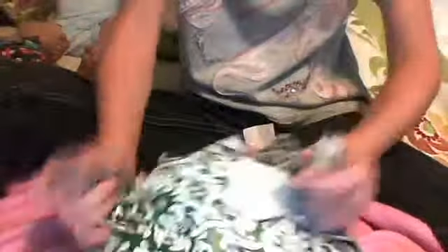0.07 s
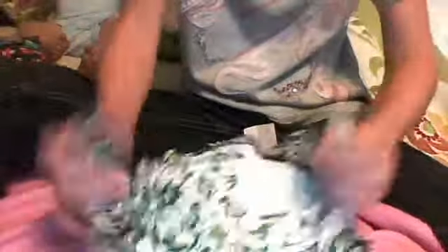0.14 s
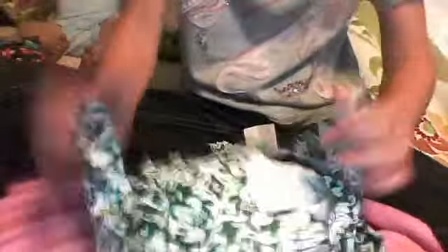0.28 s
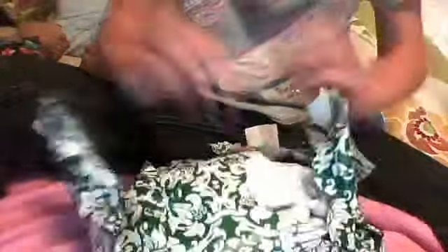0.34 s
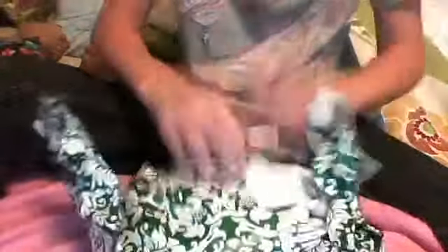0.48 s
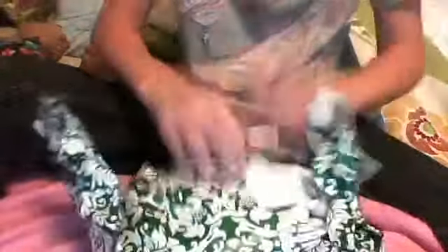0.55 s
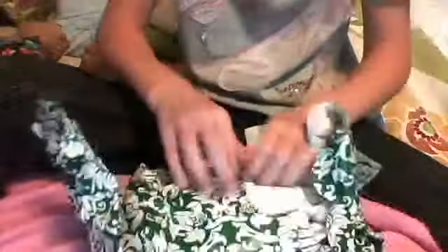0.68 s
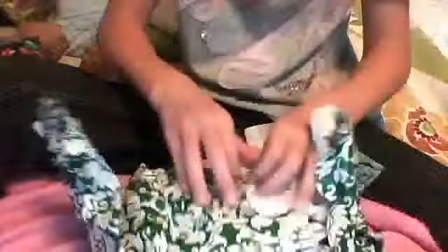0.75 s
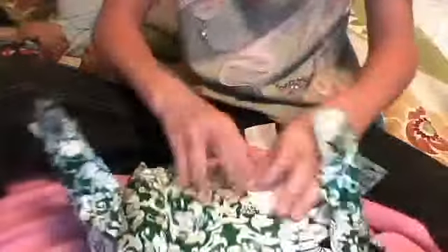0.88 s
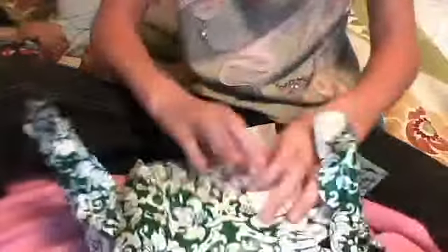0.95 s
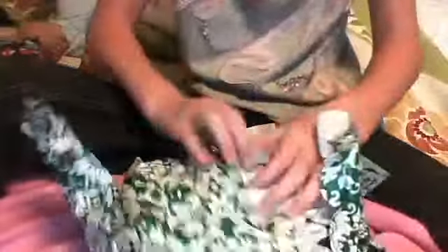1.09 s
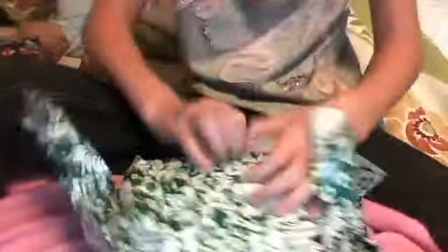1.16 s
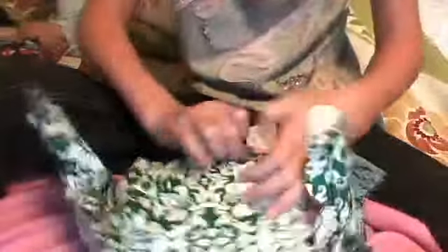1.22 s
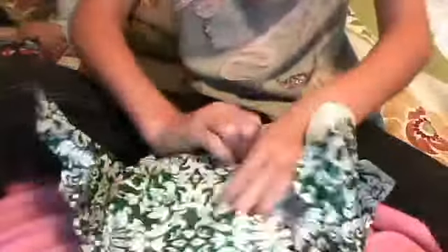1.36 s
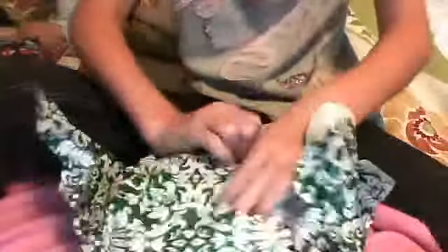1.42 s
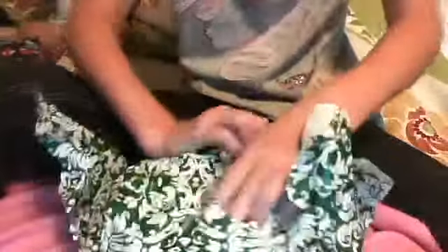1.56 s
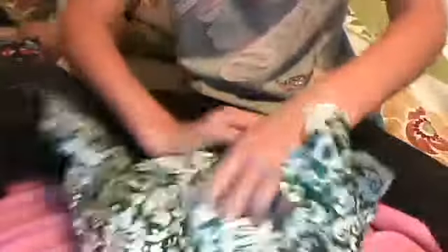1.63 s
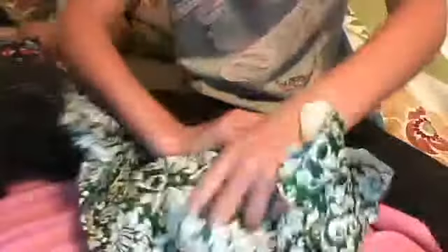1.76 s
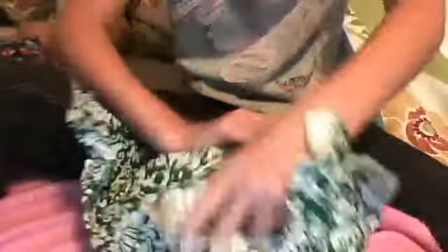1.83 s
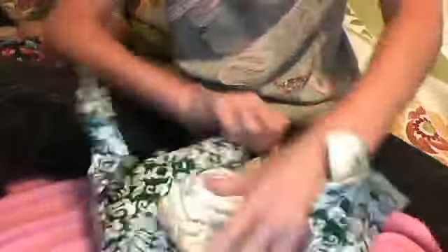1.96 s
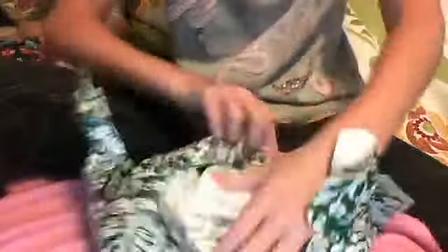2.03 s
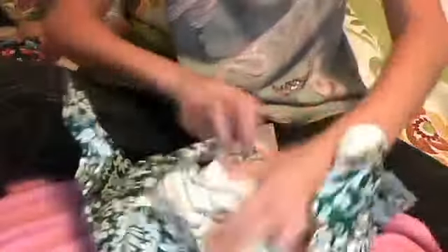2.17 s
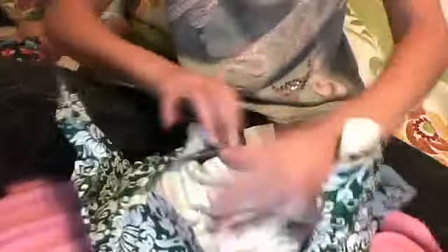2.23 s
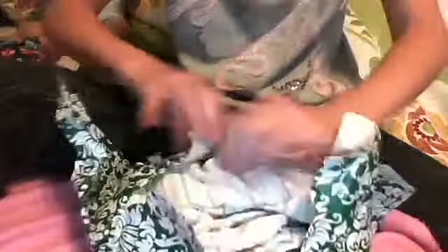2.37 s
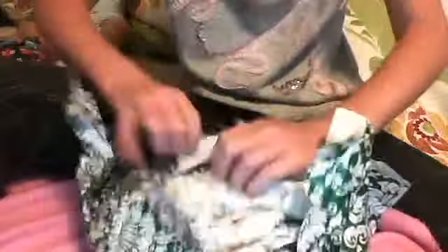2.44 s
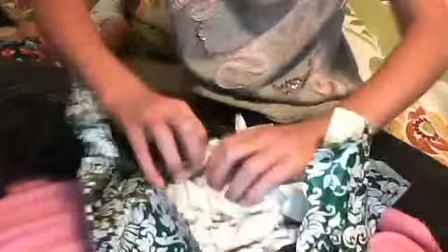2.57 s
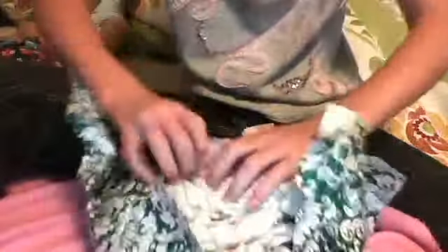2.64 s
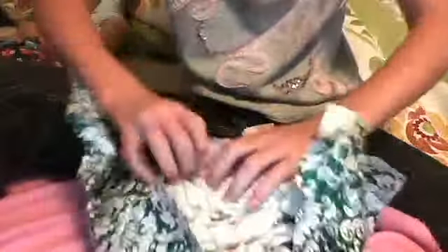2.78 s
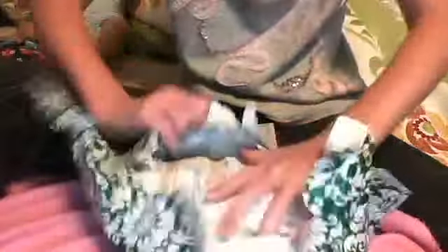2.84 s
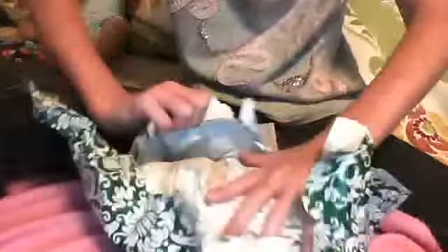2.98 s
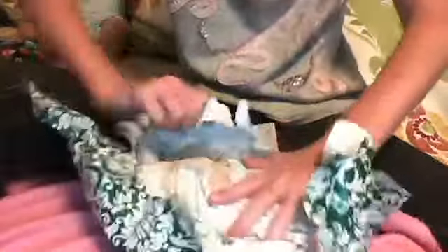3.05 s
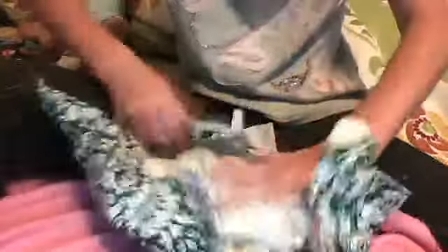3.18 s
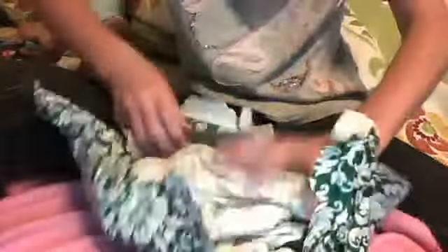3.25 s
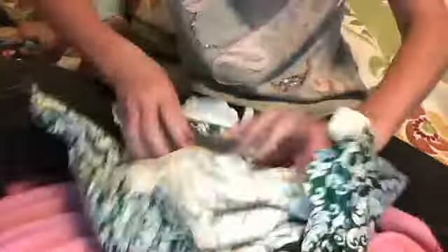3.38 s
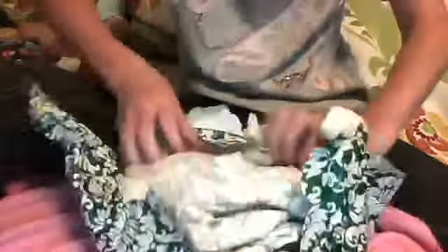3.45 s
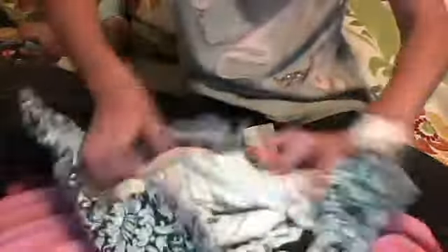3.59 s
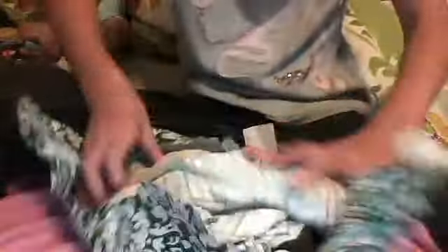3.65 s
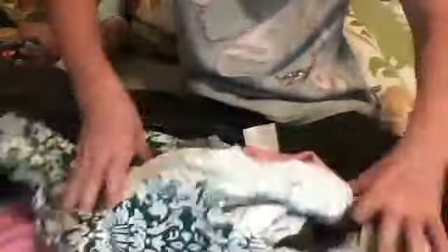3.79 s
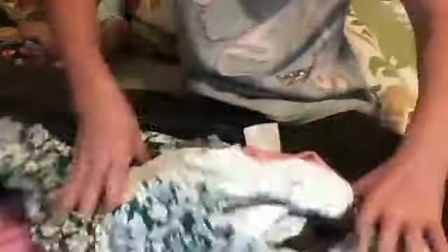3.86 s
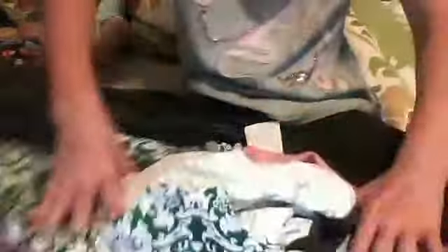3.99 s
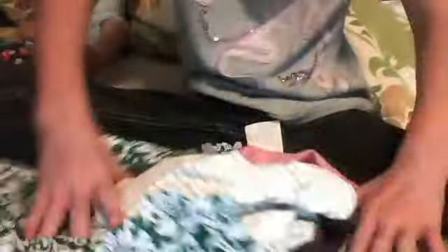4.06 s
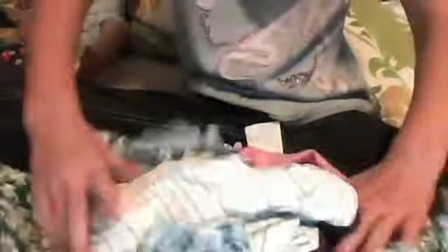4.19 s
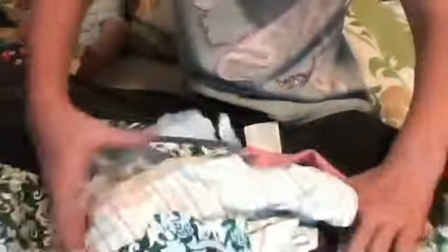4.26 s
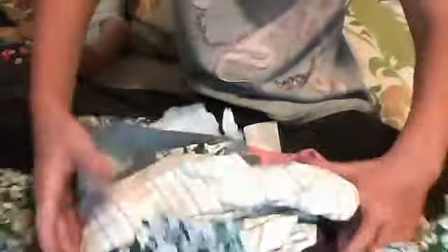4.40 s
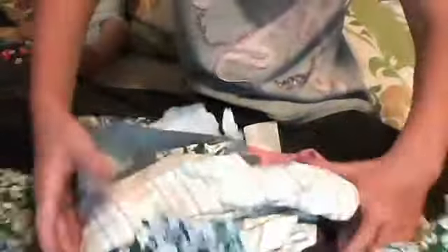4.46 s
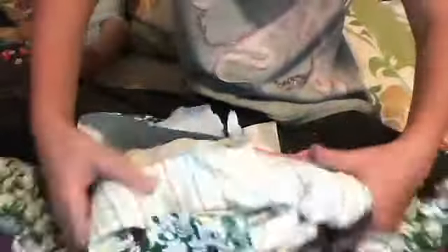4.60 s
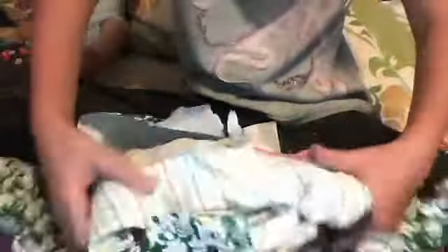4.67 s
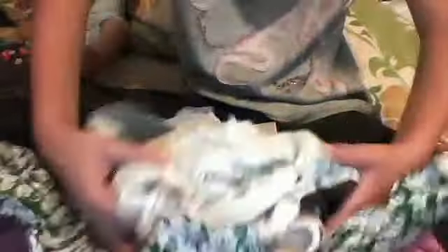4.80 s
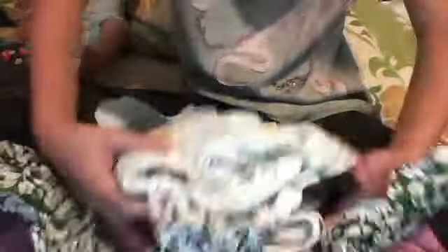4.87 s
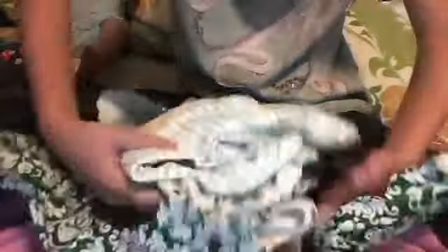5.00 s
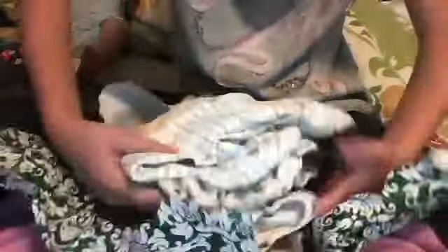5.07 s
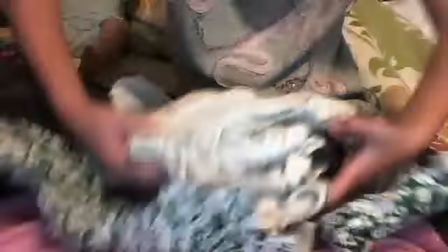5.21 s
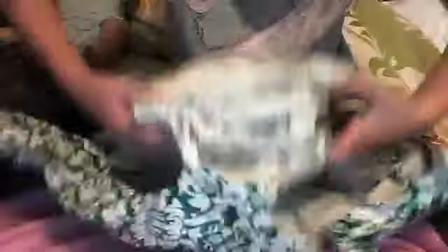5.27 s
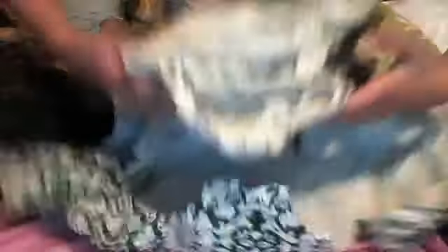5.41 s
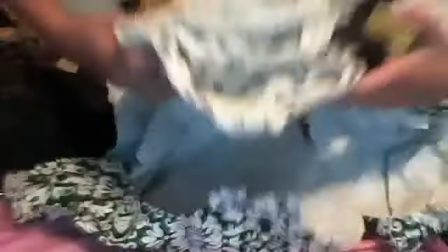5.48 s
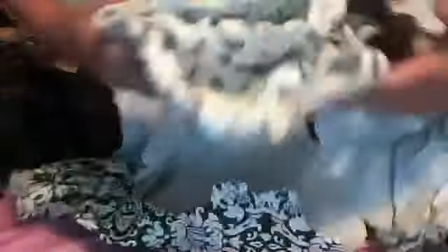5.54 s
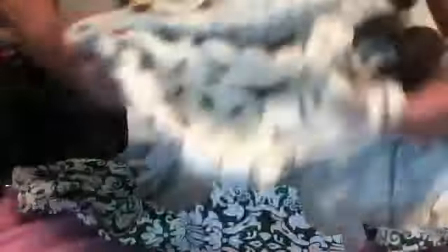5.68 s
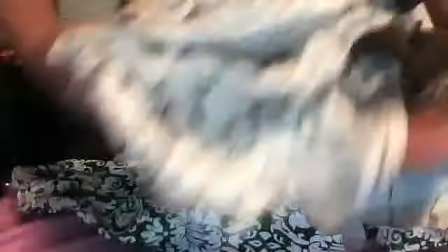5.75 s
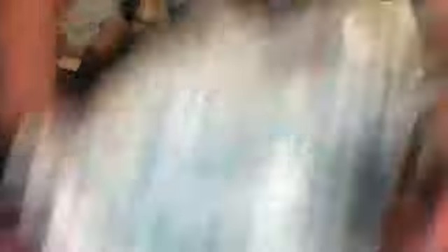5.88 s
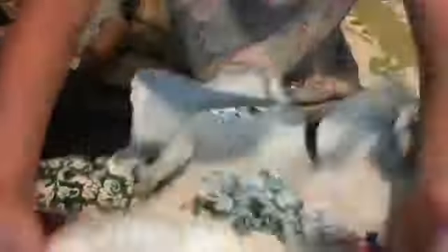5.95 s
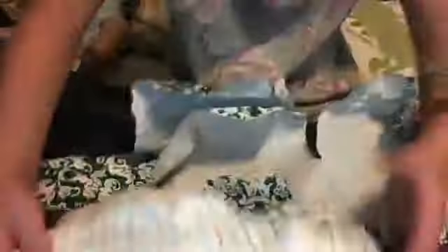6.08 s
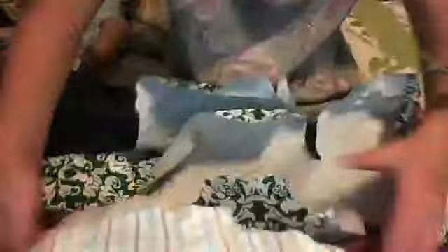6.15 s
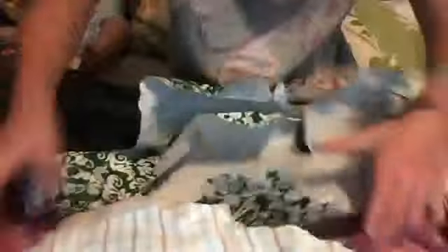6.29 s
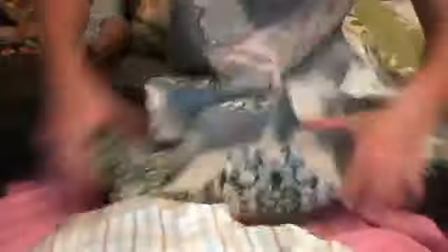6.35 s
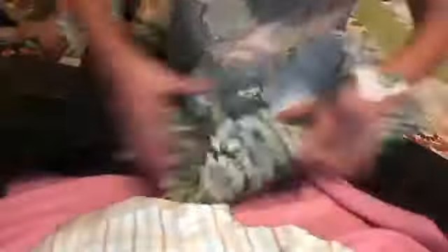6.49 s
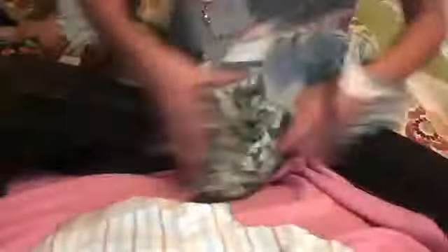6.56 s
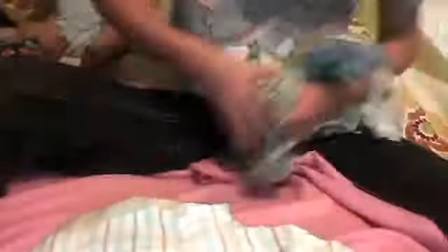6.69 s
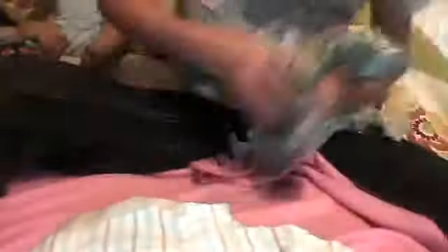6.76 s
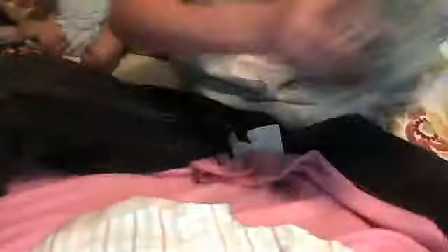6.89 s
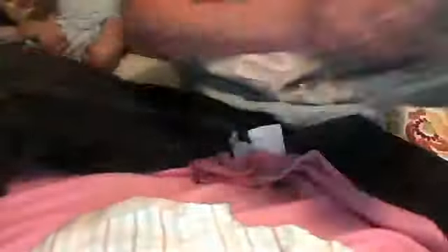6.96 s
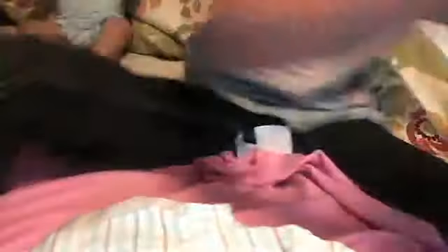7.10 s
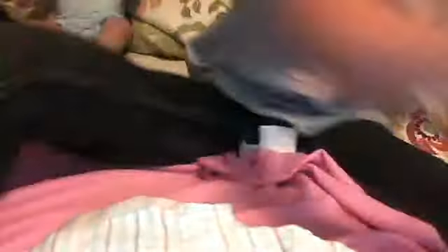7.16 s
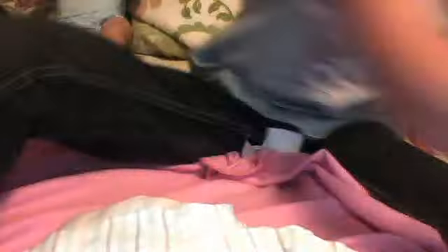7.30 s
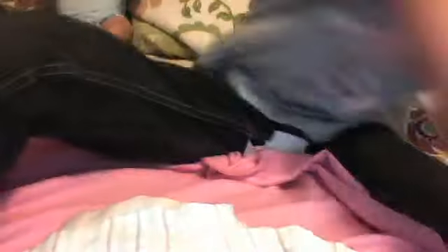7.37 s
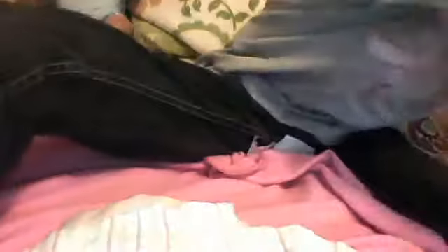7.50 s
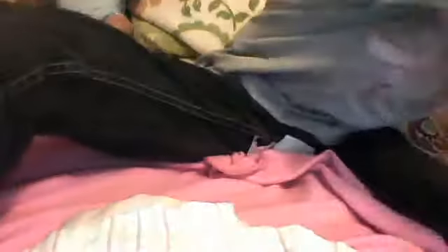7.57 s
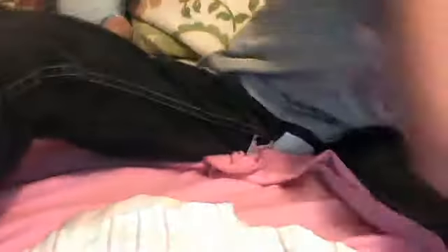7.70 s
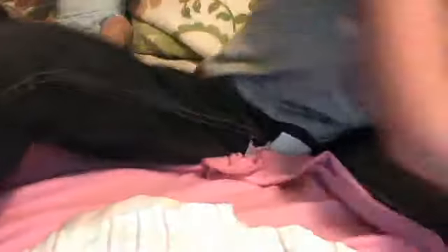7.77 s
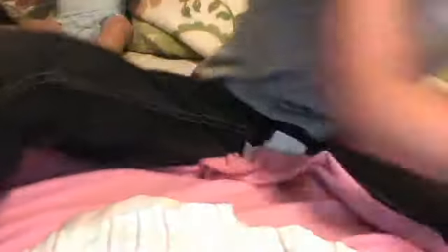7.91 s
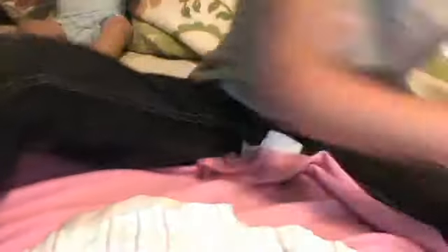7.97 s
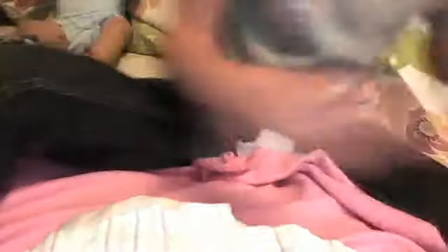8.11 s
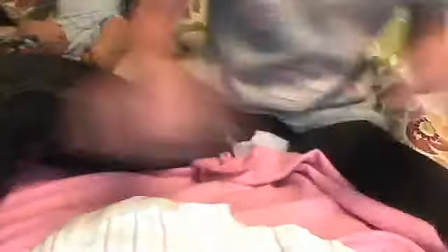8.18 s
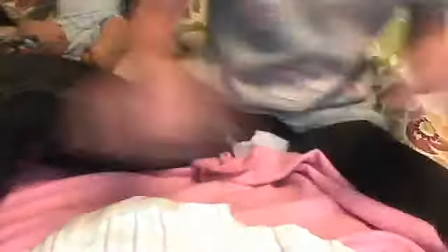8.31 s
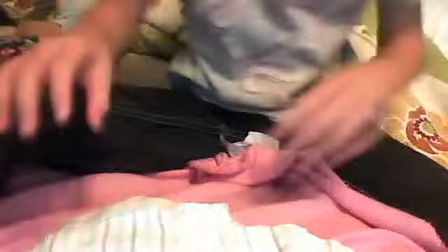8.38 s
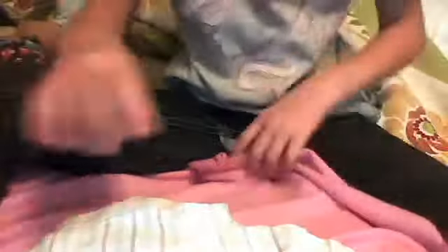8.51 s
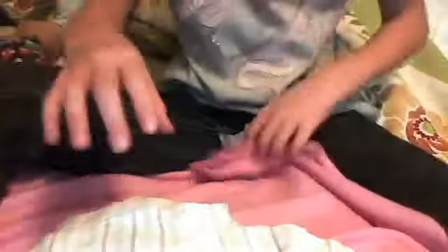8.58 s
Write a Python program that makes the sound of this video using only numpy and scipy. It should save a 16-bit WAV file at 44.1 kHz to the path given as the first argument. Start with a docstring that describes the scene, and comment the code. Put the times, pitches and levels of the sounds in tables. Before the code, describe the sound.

Folded fabric is picked at and swept about indoors, with muffled rubbing, crisp creasing snaps, low bumps and one heavy overloaded buffet.

```python
"""Folded clothes are handled on a bed right in front of a small microphone: fibres slip in clumps and creases
snap, all coloured by the microphone housing. Snaps crowd together from 1.2 s and again near 3.6 s, with
rubbing and sparser crackle between; from 5.8 s a gust of cloth-driven air slams the capsule from stop to stop
and pins it briefly. Smoother rubbing follows, far cloth takes over near 7.15 s, and the hands ease off.
Bumps, air swings and faint room noise lie underneath; a narrow-band recorder overloads on the peaks."""
import sys
import numpy as np
from scipy import signal
from scipy.fft import rfft, irfft
from scipy.io import wavfile
from scipy.ndimage import uniform_filter1d

SR = 44100
rng = np.random.default_rng(int(sys.argv[2]) if len(sys.argv) > 2 else 0)


def transcribe(signal):
    """Save signal, clipped to [-1, 1], as a 16-bit WAV file at the path in sys.argv[1]."""
    frames = np.atleast_2d(signal).T
    limited = np.clip(frames, -1, 1)
    pcm = np.round(limited * 32767).astype(np.int16)
    wavfile.write(sys.argv[1], SR, pcm)


def ratio_of_db(decibels):
    """Turn decibels (scalar or array-like) into linear amplitude factors; 0 dB maps to 1."""
    return 10 ** (np.asarray(decibels, float) / 20)


N = 381068


def rms_one(x):
    """Scales a signal to an rms of 1."""
    return x / np.sqrt(np.mean(x ** 2) + 1e-20)


def in_time(rows):
    """Draws each column of a table as straight lines between its times."""
    start_s, *columns = np.transpose(rows)
    return [np.interp(np.arange(N) / SR, start_s, column) for column in columns]


def drift(rate_hz):
    """Slow chance of spread 1: noise through a double one-pole low-pass, run in, at an eighth of the rate."""
    pole = np.exp(-16 * np.pi * rate_hz / SR)
    noise = rng.standard_normal(N // 8 + 4002)
    slow = signal.lfilter([1], [1, -2 * pole, pole * pole], noise)[4000:]
    return np.interp(np.arange(N) / 8, np.arange(len(slow)), rms_one(slow))


def response(spectrum, size=16384):
    """Causal impulse response of energy 1 with the given spectrum (folded cepstrum)."""
    pitch_hz, level_db = np.transpose(spectrum)
    grid_hz = np.maximum(np.arange(size // 2 + 1) * SR / size, 1)
    gain = ratio_of_db(np.interp(np.log(grid_hz), np.log(pitch_hz), level_db))
    cepstrum = irfft(np.log(gain))
    cepstrum[1:size // 2] *= 2
    cepstrum[size // 2 + 1:] = 0
    h = irfft(np.exp(rfft(cepstrum)))
    return h / np.sqrt(np.sum(h ** 2))


def through(spectrum, x):
    """Colours a signal with a spectrum."""
    return signal.fftconvolve(x, response(spectrum))[:N]


def split(spectrum):
    """A response split into its dull, crinkly and hissing parts, each of energy 1."""
    low_hz, high_hz = 1205, 3030
    whole = response(spectrum)
    parts = []
    for cut_hz, kind in ((low_hz, "low"), ((low_hz, high_hz), "band"), (high_hz, "high")):
        part = signal.sosfilt(signal.butter(4, cut_hz, kind, fs=SR, output="sos"), whole)
        parts.append(part / np.sqrt(np.sum(part ** 2)))
    return parts


def slips(per_s, spread_db, clump):
    """Fibres let go at random with uneven force; the clump gain bunches them."""
    force = ratio_of_db(spread_db * np.minimum(rng.exponential(1, N), 4))
    signed = force * rng.choice([-1, 1], N)
    return rms_one(signed * (rng.random(N) < per_s / SR) * clump)


# colour of the room noise: pitch_hz [Hz], level_db [dB per Hz]
ROOM_COLOUR = [(35, -28.5), (60, -3.5), (162, -2), (927, -13.5), (1100, -5), (1480, -10.5), (1930, -15),
               (3930, -22.5), (5300, -34), (6890, -62), (11700, -120)]


def room_noise():
    """Steady random noise with the colour of the room."""
    return ratio_of_db(-43.5) * through(ROOM_COLOUR, rng.standard_normal(N))


# colour of the air swings: pitch_hz [Hz], level_db [dB per Hz]
AIR_COLOUR = [(5, -0.5), (15, -5), (35, 3), (55, -9), (100, -25.5), (300, -68)]
# cloth fanning the capsule: start_s [s], push_db [dB]
FANNING_MOVES = [(0.0, -31), (0.19, -21.5), (0.33, -33.5), (0.42, -15), (0.59, -22), (0.78, -13.5),
                 (0.85, -33), (1.04, -31), (1.14, -17), (1.16, -26), (1.89, -26.5), (1.92, -19.5),
                 (2.46, -29.5), (2.51, -20), (3.41, -32.5), (3.72, -15), (3.79, -25), (4.47, -26),
                 (4.5, -25.5), (4.88, -24.5), (5.02, -33.5), (5.35, -27.5), (5.66, -39.5), (5.71, -20),
                 (5.75, -27.5), (5.92, -3), (6.06, -24.5), (6.11, -17.5), (6.15, -21.5), (6.27, -35),
                 (6.32, -20), (6.79, -37), (7.08, -34.5), (7.27, -16), (7.5, -33.5), (8.5, -40)]


def air_push():
    """Slow pressure swings of cloth fanning the capsule; their size follows the hands more than chance."""
    push_db, = in_time(FANNING_MOVES)
    swings = rms_one(through(AIR_COLOUR, rng.standard_normal(N)))
    chance_size = np.sqrt(uniform_filter1d(swings ** 2, size=SR // 16) + .15)
    # during the big gust the throws of the diaphragm take the place of the gentle swings
    calm = np.interp(np.arange(N) / SR, (5.79, 5.81, 5.98, 6.0), (1, 0, 0, 1))
    return calm * ratio_of_db(push_db) * rms_one(swings / chance_size)


# diaphragm thrown from stop to stop: start_s [s], relative position after the throw [-1..1], throw_s [s]
THROWS = [(5.802, 0.36, 0.0012), (5.832, .6, 0.019), (5.850, -0.23, 0.022), (5.872, 0.9, 0.0017),
          (5.881, -1, 0.0015), (5.8934, 1, 0.0015), (5.897, -0.6, .0009), (5.9041, 0.85, 0.0015),
          (5.917, -.7, 0.00073), (5.935, 0.45, 0.00089), (5.985, -0.11, 0.0057)]


def slams():
    """Each throw overshoots and relaxes towards the held position."""
    hold_gain, kick_gain = 0.59, 0.73
    relax_hz, edge_hz, coupling_hz = 74.5, 1300, 1
    t = np.arange(N) / SR
    held, last_place = np.zeros(N), 0
    for start_s, place, throw_s in THROWS:
        held += (place - last_place) * np.clip((t - start_s) / max(throw_s, 1 / SR), 0, 1)
        last_place = place
    held = signal.sosfilt(signal.butter(2, edge_hz, fs=SR, output="sos"), held)
    kick = signal.lfilter(*signal.butter(2, relax_hz, "high", fs=SR), held)
    # the coupling capacitor lets a held position leak away
    leaking = signal.lfilter(*signal.butter(1, coupling_hz, "high", fs=SR), held)
    return hold_gain * leaking + kick_gain * kick


# how well the diaphragm follows sound around the gust: start_s [s], sensitivity_db [dB]
SENSITIVITY = [(5.859, 0), (5.865, -9), (5.935, -15), (5.945, -25), (5.976, -21), (5.982, 2.5), (5.995, 1)]


def diaphragm(sound):
    """A pinned diaphragm hardly follows the sound; its own slams come on top."""
    sensitivity_db, = in_time(SENSITIVITY)
    return sound * ratio_of_db(sensitivity_db) + slams()


# colour of the bumps: pitch_hz [Hz], level_db [dB per Hz]
THUD_COLOUR = [(40, -16), (70, 1.5), (150, -2.5), (300, -12), (500, -27), (1000, -43.5)]


def thuds(level_db):
    """Lumpy structure-borne bumps as the cloth drags over the bed and the case."""
    lumps = ratio_of_db(2.7 * drift(51))
    return through(THUD_COLOUR, slips(900, 2.46, lumps) * ratio_of_db(level_db))


# what the hands are on: start_s [s], hiss_db [dB over crinkle], thud_db [dB over rubbing]
CLOTH_KIND = [(0, -5, -2), (.3, -7, -1.5), (.6, -9.5, 2.5), (.9, -9.5, -6), (1.2, -6, -5.5), (1.52, -8, -9),
              (1.62, -7.5, -4), (1.901, 0.5, 7), (2.15, -4.5, 0.5), (2.399, -10.5, -3), (2.68, -4.5, 1),
              (2.8, -8.5, -1.5), (3.1, -4.5, -1), (3.4, -5.5, -0.5), (3.62, -7.5, -0.5), (3.92, -0.5, 5),
              (4.1, -8, -1), (4.3, -6, 7), (4.6, -4, 3.5), (4.8, -4, 2), (5.13, -2, 0), (5.45, -15, -3.5),
              (5.839, -14, -1), (5.88, -14, 25.5), (5.94, -8, 26), (5.97, -7, 8), (6.03, -12.5, 6),
              (6.4, -5, -1), (6.65, -7, -8), (6.9, -6, -10), (7.15, -4.5, 2.5), (7.22, -10, -4),
              (7.349, -14.5, -8), (7.701, -11.5, -5.5), (8.64, -10, -4)]


def cloth_kind():
    """The balance of hiss and thud follows the cloth under the hands."""
    return in_time(CLOTH_KIND)


# effort of the hands: start_s [s], rub_db [dB], crinkle_db [dB over rubbing]
HAND_EFFORT = [(0, -27.5, -13), (.05, -27.5, 1.5), (.1, -31, -8.5), (.25, -42, -1), (.34, -40.5, -11),
               (.36, -27.5, -7), (.42, -35, -3), (.58, -30.5, -4), (.66, -38.5, -7), (.77, -32.5, -6.5),
               (.87, -23.5, -6.5), (.92, -33, -8), (1.03, -28.5, -8), (1.15, -28, -4.5), (1.23, -26, -7),
               (1.28, -37, -4), (1.295, -22.5, -1.5), (1.35, -29, -3.5), (1.38, -22, -5.5),
               (1.44, -45.5, -2), (1.49, -19.5, -3.5), (1.54, -11.5, -0.5), (1.6, -19.5, -6.5),
               (1.625, -15, 1), (1.648, -29, -3), (1.66, -17, -4), (1.68, -18.5, -2.5), (1.82, -25.5, -6),
               (1.99, -36, -4.5), (2.02, -21, -11), (2.04, -40, -1), (2.1, -30, -3.5), (2.2, -38.5, -11.5),
               (2.35, -27, -8), (2.45, -33.5, -6.5), (2.55, -29, -1.5), (2.6, -30, -6), (2.65, -31.5, 1.5),
               (2.69, -20.5, -2.5), (2.76, -16, -2), (2.89, -23, -6), (2.98, -16, -8), (3.04, -21, -6.5),
               (3.13, -31, -14), (3.25, -32.5, -7), (3.38, -38, -10), (3.51, -26, -11), (3.56, -15, -5.5),
               (3.64, -13, -5.5), (3.7, -18.5, -5), (3.83, -31, -3), (4.09, -29.5, -3.5), (4.28, -32, -2),
               (4.35, -31, -6), (4.55, -34, -3.5), (4.62, -28, -1), (4.76, -29.5, -9), (4.87, -33.5, -4.5),
               (4.98, -40, -13), (5.13, -33, -5.5), (5.36, -35, -6), (5.48, -36.5, -2), (5.58, -40, -5),
               (5.68, -29, -8), (5.72, -37, -4.5), (5.76, -38.5, -12), (5.84, -32, -9), (5.851, -16.5, -4),
               (5.87, -30, -9), (5.99, -38, -8), (6.015, -31.5, 5.5), (6.06, -42, -30), (6.23, -38.5, -6.5),
               (6.42, -23.5, -15), (6.56, -18, -7), (6.64, -25, -3), (6.73, -20.5, -6.5), (6.85, -26.5, -1),
               (6.95, -33.5, -3), (7.05, -41.5, -6), (7.1, -32, -11), (7.16, -35, -4), (7.19, -15.5, -5.5),
               (7.25, -17.5, -6), (7.34, -24.5, -2), (7.44, -33, -8.5), (7.52, -28.5, 1), (7.68, -35.5, -7),
               (8.25, -39.5, -10), (8.64, -40, -6.5)]


def hand_effort():
    """Harder work raises the rubbing; the crinkle rides on it."""
    return in_time(HAND_EFFORT)


# strokes that speed up and end dead: start_s [s], step_db [dB], reach_s [s]
STROKE_ENDS = [(.89, 13, 0.026), (1.399, 4, 0.04), (1.593, 14, 0.041), (2.121, 14, 0.052),
               (2.826, 4, 0.034), (3.1, 7.5, 0.069), (3.774, 5.5, 0.081), (6.96, 8, 0.064)]


def dead_stops():
    """The level leans up into each stop, drops at once and creeps back."""
    t = np.arange(N) / SR
    lean_db = np.zeros(N)
    for start_s, step_db, reach_s in STROKE_ENDS:
        nearness = np.clip(1 - np.abs(t - start_s) / reach_s, 0, 1)
        lean_db -= step_db / 2 * np.sign(t - start_s) * nearness
    return lean_db


# hands picking at folds or sweeping smoothly: start_s [s], bunching_db [dB], far cloth [share 0-1]
HAND_JERKINESS = [(0, 4.5, 0.13), (1.4, 4.5, 0.06), (2.2, 5, 0.4), (2.7, 1.5, 0.2), (3.6, 2, 0),
                  (4.9, 2.5, 0.3), (5.8, 5, 0.3), (6.3, 0, 0.1), (6.9, 1.5, 0.3), (7.15, -4.8, 0.9),
                  (8.64, 1.2, 0.2)]


def hand_jerkiness():
    """Picking bunches the slips together; a sweep to the side moves them to the far cloth."""
    return in_time(HAND_JERKINESS)


# resonances of the microphone housing: pitch_hz [Hz], level_db [dB per Hz]
HOUSING_COLOUR = [(150, -27.5), (250, -1.5), (335, 0), (401, 1), (558, -3.5), (817, 2), (1040, -0.5),
                  (1230, -12.5), (1490, -5.5), (1710, -6), (1920, -10), (2320, -7), (3240, -19),
                  (3920, -19), (5250, -32.5), (6820, -79.5), (11600, -120)]


def housing_parts():
    """Near cloth is heard through the housing, as dull, crinkly and hissing responses."""
    return split(HOUSING_COLOUR)


# clearest snaps and knocks: start_s [s], peak_db [dB], bright_db [dB], pitch_hz of the crease [Hz]
CLEAR_SNAPS = [(0.039, -8.5, -13, 2110), (0.358, -14, -17, 1510), (0.45, -19, -9, 1990),
               (0.48, -16, -27, 1450), (0.537, -20, -10.5, 1660), (0.673, -18, -6, 1950),
               (0.872, -9, 1, 1510), (0.967, -20, -9, 1730), (1.01, -13.5, -15, 1500),
               (1.084, -2.5, -12, 1560), (1.159, -25, -1, 1470), (1.219, -10, -13, 1490),
               (1.234, -3.5, 4.5, 2000), (1.289, -6.5, -5.5, 1540), (1.327, -11, -4, 1560),
               (1.358, -6.5, -11, 1600), (1.434, -17, -4, 1500), (1.471, -12.5, -7, 1300),
               (1.495, -5, -17, 1880), (1.523, -4, -16, 1570), (1.541, 3, -25, 1470),
               (1.567, -1.5, -9.5, 1470), (1.584, -5, -12.5, 2320), (1.608, -1, -12, 1570),
               (1.629, -6, -10, 1420), (1.657, -11.5, -6, 2330), (1.689, -5, -14, 1740),
               (1.722, -5, -19, 1720), (1.759, -8, -13, 1540), (1.839, -4.5, -14, 1300),
               (1.918, -16, -25, 1520), (2.014, -9.5, -15, 1350), (2.078, -15.5, -4.5, 1430),
               (2.107, -22, -12, 2230), (2.41, -15.5, -12, 1560), (2.554, -21.5, 0, 1700),
               (2.588, -11, -4, 1500), (2.682, -6, -15, 2230), (2.715, -13, -2, 1620),
               (2.902, -8, -6, 1610), (2.951, -6.5, -16, 1560), (3.182, -15.5, -9, 1470),
               (3.249, -19, -16, 1320), (3.499, -13.5, -14, 1540), (3.525, -15.5, -9, 2410),
               (3.548, -4, -7.5, 1430), (3.573, -2, -13, 2350), (3.595, -2, -12.5, 1600),
               (3.635, -0.5, -21, 1420), (3.708, -4, -2, 1320), (3.856, -10.5, -7.5, 1570),
               (3.937, -15, 2, 2470), (4.056, -14, -15, 1560), (4.152, -17, -3, 1680),
               (4.207, -15.5, -23, 1530), (4.267, -14, -14, 2240), (4.29, -17, -2, 1680),
               (4.351, -18, -11, 1580), (4.439, -16, -8, 1620), (4.477, -18.5, -10, 1480),
               (4.606, -15, -6, 1580), (4.76, -10, -9.5, 2000), (4.861, -16.5, -1, 1520),
               (4.933, -22, -8, 2440), (5.082, -20, -7, 2830), (5.334, -20, -13, 1470),
               (5.454, -18, -8.5, 1490), (5.538, -20.5, -11, 1680), (5.612, -20.5, -9, 1700),
               (5.684, -13.5, -19.5, 1620), (5.71, -35, -7, 1640), (5.85, -1, -17, 1300),
               (5.854, -5, -18, 1860), (6.012, -22.5, -5, 1690), (6.486, -10, -9, 1610),
               (6.731, -7, -23, 1510), (6.84, -8.5, -4, 1740), (6.934, -23, -17, 1700),
               (7.161, -16.5, -2, 1390), (7.182, -9, -11, 1330), (7.513, -21, -16, 1510),
               (7.605, -21, -17, 1440), (7.825, -28, -3, 1450), (7.895, -24.5, -7, 1810),
               (8.482, -29.5, -18, 1460)]


def all_snaps(rub_db, jerk_db):
    """The clear snaps, and lesser ones at random moments whose strength follows effort and jerkiness."""
    per_s, over_rub_db, spread_db = 16, 9.5, 4.5
    bright_db, bright_spread_db = -8.5, 7
    low_hz, high_hz = 1300, 4900
    when, force, colour, size = rng.random((round(per_s * N / SR), 4)).T
    at = (when * (N - 1)).astype(int)
    # smooth sweeps crackle more softly
    peak_db = rub_db[at] + over_rub_db + 0.5 * (jerk_db[at] - 4.5) + spread_db * (2 * force - 1)
    brightness_db = bright_db + bright_spread_db * (2 * colour - 1)
    pitch_hz = low_hz * (high_hz / low_hz) ** size
    return np.vstack([CLEAR_SNAPS, np.transpose([at / SR, peak_db, brightness_db, pitch_hz])])


def sticking(creases):
    """The cloth grips and falls quieter for a moment before each snap, less so before the lesser ones."""
    stick_db, stick_s, lesser_grip = -3.5, 0.018, 0.49
    gripped = np.zeros(N)
    # clear snaps are written last, over the lesser ones
    for k, (start_s, *_) in reversed(list(enumerate(creases))):
        grip = 1 if k < len(CLEAR_SNAPS) else lesser_grip
        gripped[max(round((start_s - stick_s) * SR), 0):round(start_s * SR)] = grip
    return ratio_of_db(stick_db * uniform_filter1d(gripped, size=SR // 500))


def snaps(creases):
    """Each snap is a sharp release followed by a short dying flurry of slips and a ring of the taut crease."""
    ring_db, ring_cycles = -4, 15   # ring against brightness; cycles to fall by 60 dB
    dull, crinkly, hissing = housing_parts()
    out, t = np.zeros(N + SR), np.arange(SR // 8) / SR
    flurries = rng.standard_normal((len(creases), len(t)))
    flurries[:, :6] = 2.14 * np.sign(flurries[:, :1])   # the release itself: one short hard pulse
    for (start_s, peak_db, bright_db, pitch_hz), flurry in zip(creases, flurries):
        # hard snaps die at once, soft ones linger; the turn is steep, near -9.5 dB
        t60_s = np.clip(0.02 - 0.42 * (peak_db + 9.5), .008, .2)
        ring = np.sin(2 * np.pi * pitch_hz * t) * ratio_of_db(-60 * t * pitch_hz / ring_cycles)
        colour = (dull + ratio_of_db(bright_db) * (crinkly + ratio_of_db(-4.5) * hissing))[:len(t)]
        colour = colour + ratio_of_db(bright_db + ring_db) * ring / np.sqrt(np.sum(ring ** 2))
        snap = signal.fftconvolve(flurry * ratio_of_db(-60 * t / t60_s), colour)
        out[round(start_s * SR):][:len(snap)] += ratio_of_db(peak_db) * snap / np.max(np.abs(snap))
    return out[:N]


# colour of cloth swept off to the side: pitch_hz [Hz], level_db [dB per Hz]
FAR_COLOUR = [(150, -20.5), (250, 1), (362, -5), (443, 1), (572, -2), (729, -3), (977, -5), (1260, -1.5),
              (1850, -11), (2920, -20.5), (5250, -38.5), (6820, -69.5), (11600, -120)]


def rubbing(level_db, crinkle_db, hiss_db, jerk_db, far, grip):
    """Slips of three sizes come in shared bunches of 5-20 ms, each size with a flicker of its own."""
    bunch = 1.87 * np.tanh(.3 * drift(30) + .45 * drift(98))   # no bunch towers over the rest
    coarse_clump = ratio_of_db(jerk_db * (bunch + .45 * drift(60)))
    coarse = slips(2000, 2.38, coarse_clump) * ratio_of_db(level_db)
    middle_clump = ratio_of_db(jerk_db * (1.07 * bunch + .6 * drift(45)))
    middle = slips(2500, 3.6, middle_clump) * ratio_of_db(level_db + crinkle_db)
    fine_clump = ratio_of_db(jerk_db * (0.55 * bunch + 0.73 * drift(34)))
    fine = slips(8000, 3.4, fine_clump) * ratio_of_db(level_db + crinkle_db + hiss_db)
    out = np.zeros(N)
    for size, near_h, far_h in zip((coarse, middle, fine), housing_parts(), split(FAR_COLOUR)):
        held_back = size * grip
        out += signal.fftconvolve(held_back * (1 - far), near_h)[:N]
        out += signal.fftconvolve(held_back * far, far_h)[:N]
    return out


def scene():
    """Cloth, bumps, air and room reach a diaphragm that one gust pins."""
    rub_db, crinkle_db = hand_effort()
    hiss_db, thud_db = cloth_kind()
    jerk_db, far = hand_jerkiness()
    creases = all_snaps(rub_db, jerk_db)
    sound = room_noise() + air_push() + thuds(rub_db + thud_db) + snaps(creases)
    sound += rubbing(rub_db + dead_stops(), crinkle_db, hiss_db, jerk_db, far, sticking(creases))
    return diaphragm(sound)[None]


def roll_off(x):
    """The treble ends steeply here."""
    return signal.sosfilt(signal.butter(12, 15800, fs=SR, output="sos"), x)


def record(dry):
    """Sampled at a quarter rate and stretched back, leaving a faint mirror above the band edge; clips twice."""
    band_edge_hz, image_cut_hz, mirror_end_hz = 5340, 5420, 6120
    keep_every, input_top, output_top = 4, .71, .72
    clipped = np.clip(dry, -input_top, input_top)
    narrow = signal.sosfilt(signal.ellip(12, .5, 60, band_edge_hz, fs=SR, output="sos"), clipped)
    sampled = narrow * (np.arange(N) % keep_every == 0) * keep_every
    stretched = signal.sosfilt(signal.butter(24, image_cut_hz, fs=SR, output="sos"), sampled)
    stretched = signal.sosfilt(signal.ellip(10, .5, 70, mirror_end_hz, fs=SR, output="sos"), stretched)
    # the overshoot of the filters clips again
    return roll_off(np.clip(stretched, -output_top, output_top))


dry = scene()
out = record(dry)
transcribe(out)
```